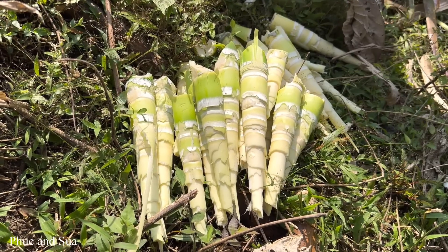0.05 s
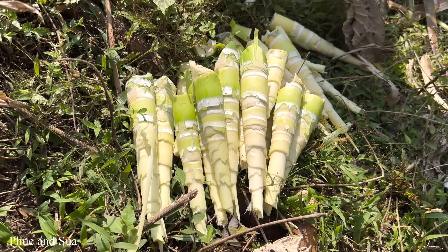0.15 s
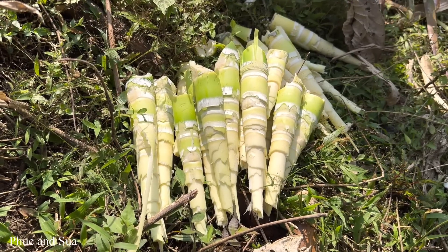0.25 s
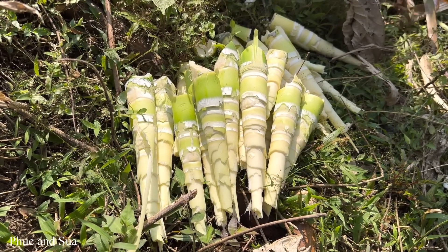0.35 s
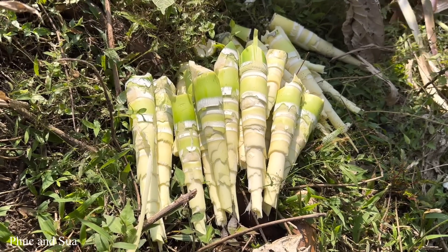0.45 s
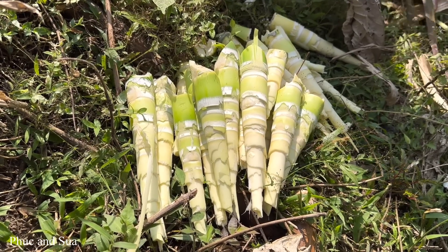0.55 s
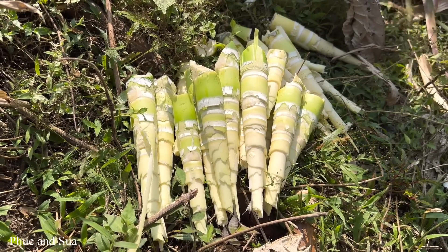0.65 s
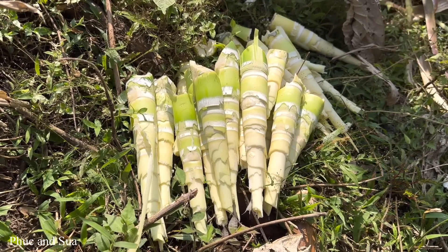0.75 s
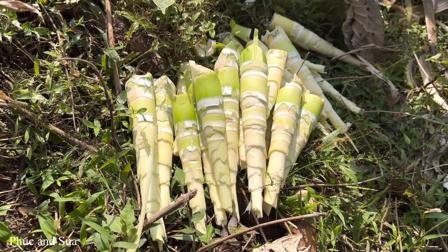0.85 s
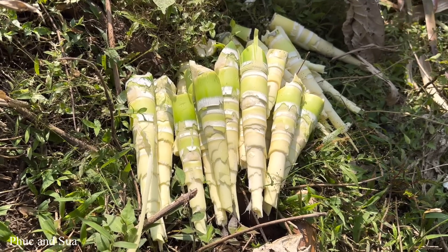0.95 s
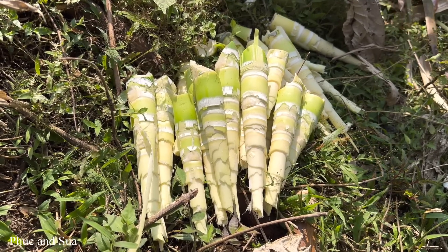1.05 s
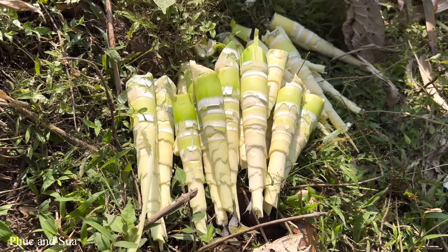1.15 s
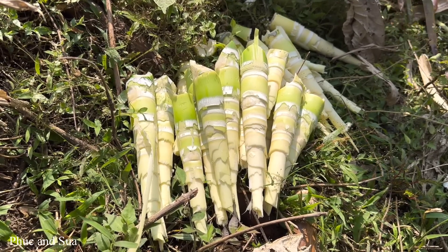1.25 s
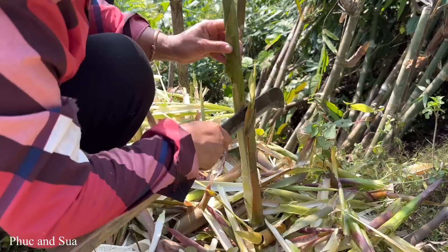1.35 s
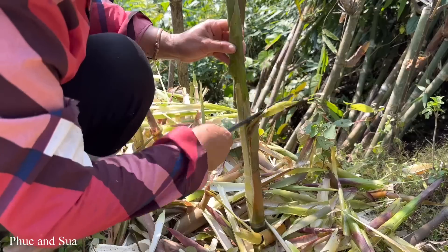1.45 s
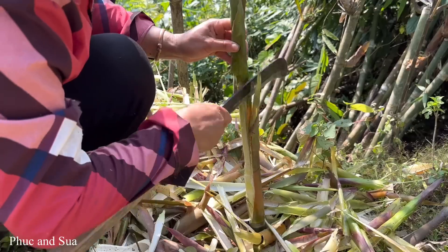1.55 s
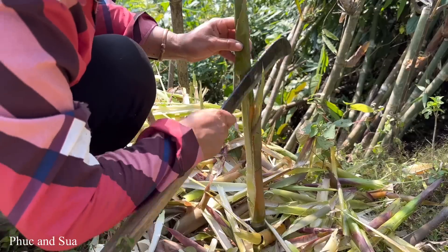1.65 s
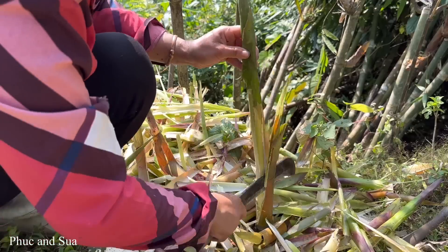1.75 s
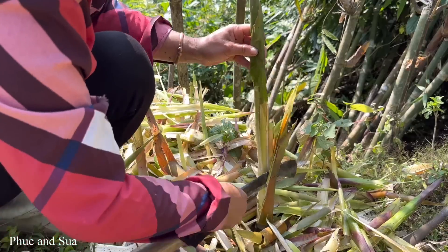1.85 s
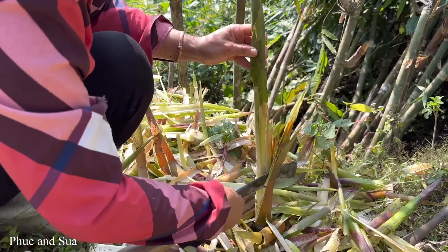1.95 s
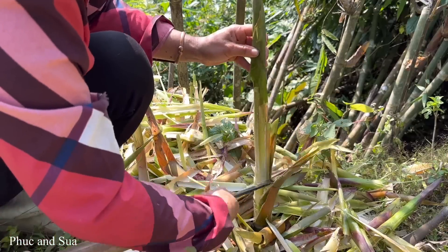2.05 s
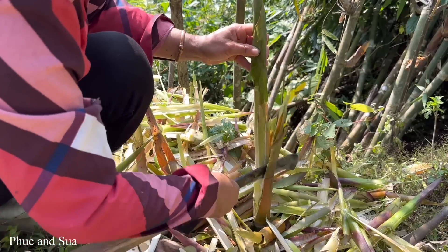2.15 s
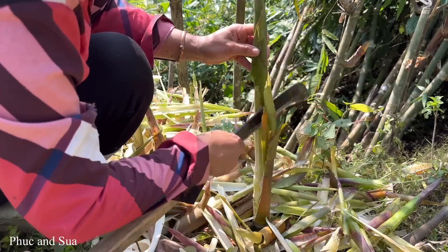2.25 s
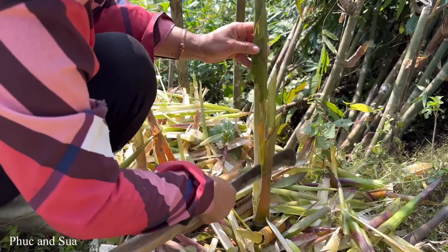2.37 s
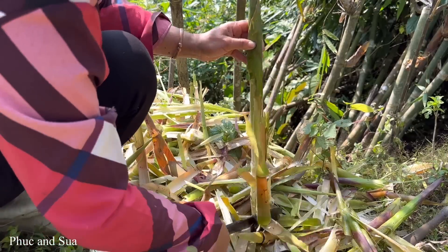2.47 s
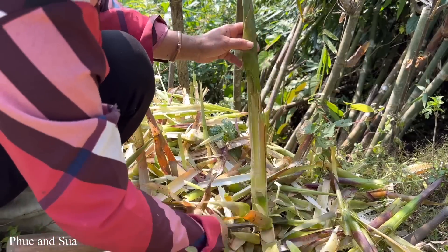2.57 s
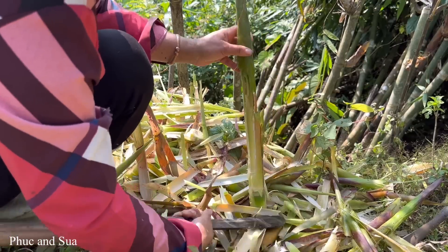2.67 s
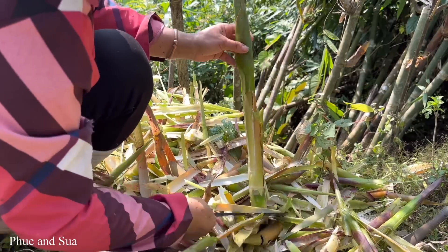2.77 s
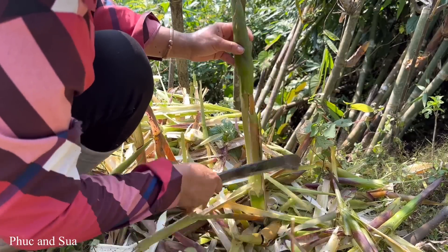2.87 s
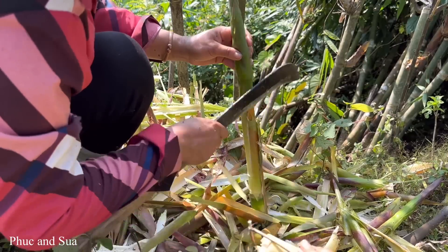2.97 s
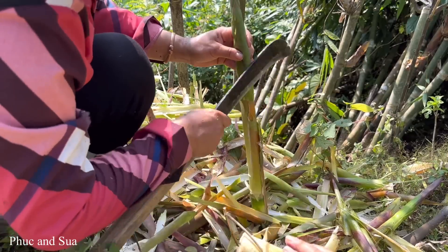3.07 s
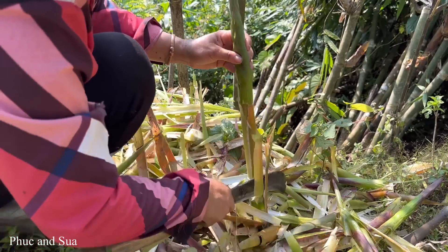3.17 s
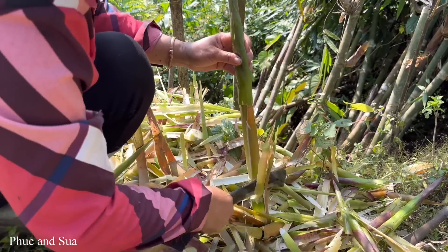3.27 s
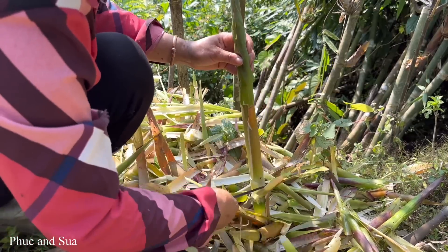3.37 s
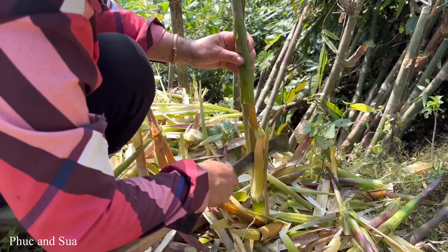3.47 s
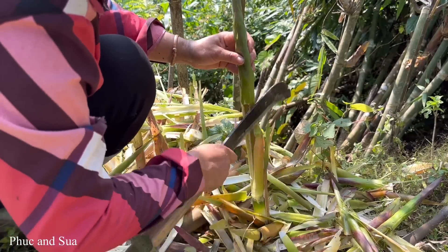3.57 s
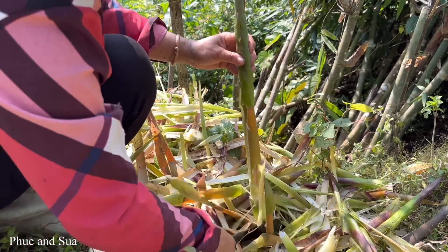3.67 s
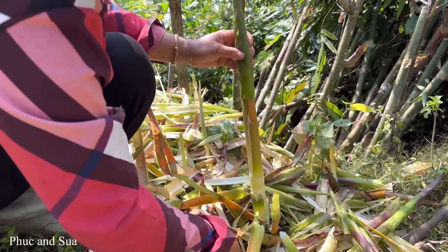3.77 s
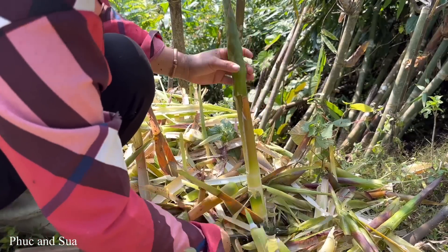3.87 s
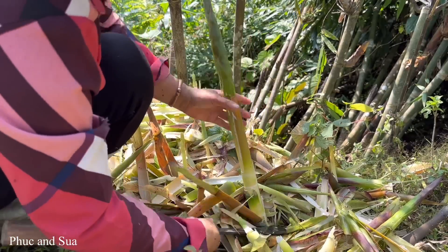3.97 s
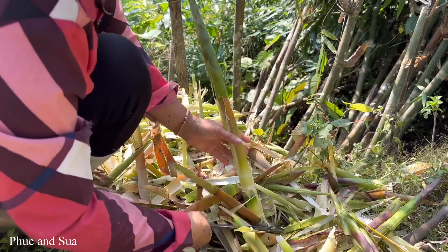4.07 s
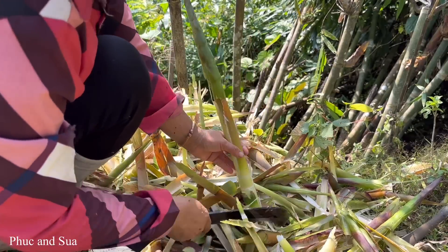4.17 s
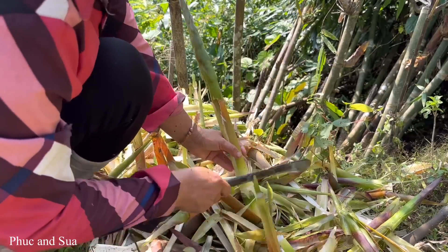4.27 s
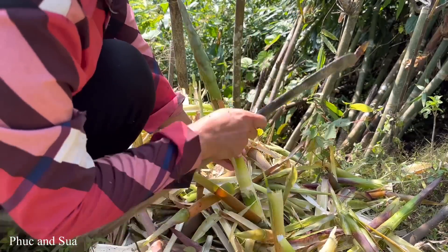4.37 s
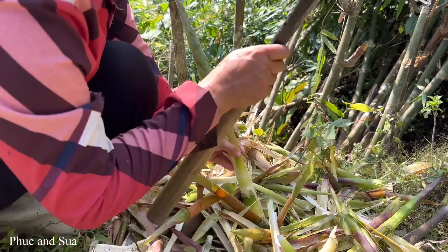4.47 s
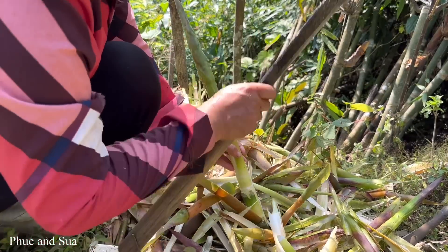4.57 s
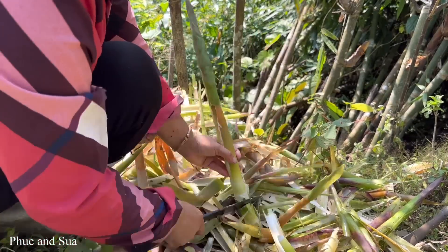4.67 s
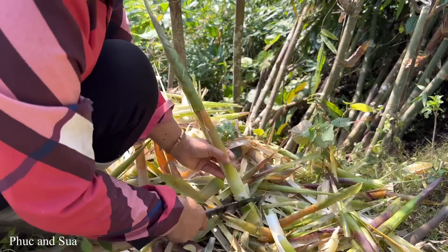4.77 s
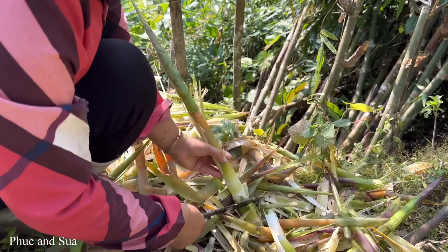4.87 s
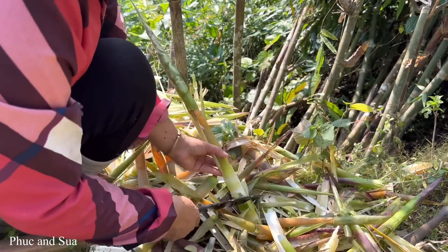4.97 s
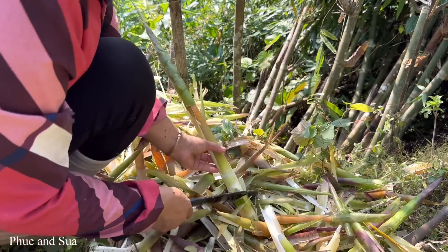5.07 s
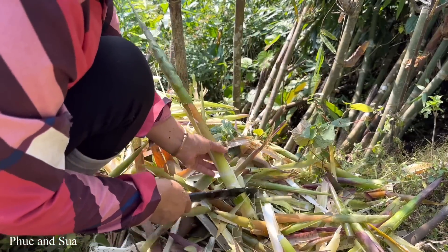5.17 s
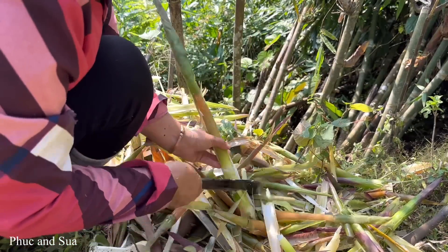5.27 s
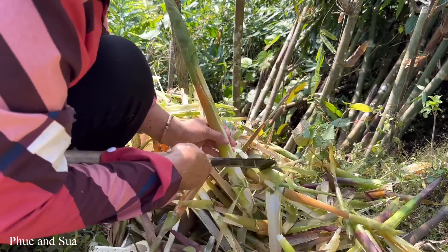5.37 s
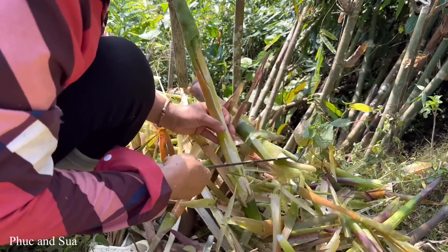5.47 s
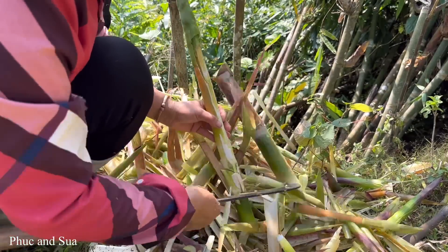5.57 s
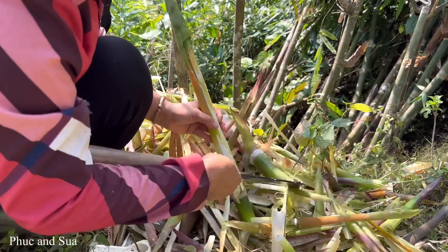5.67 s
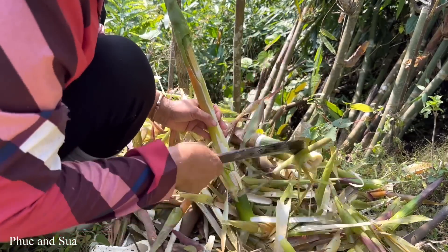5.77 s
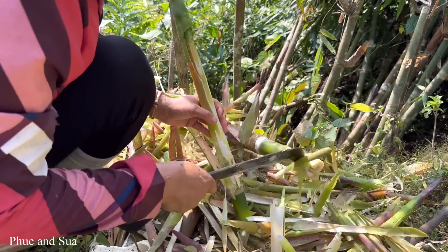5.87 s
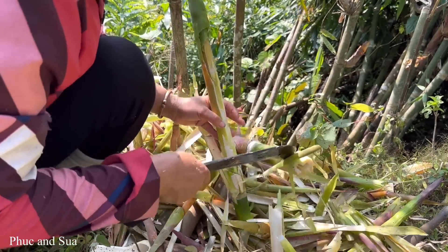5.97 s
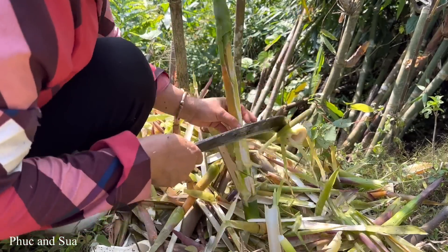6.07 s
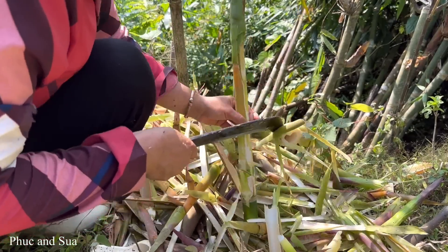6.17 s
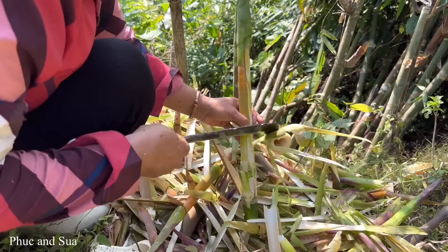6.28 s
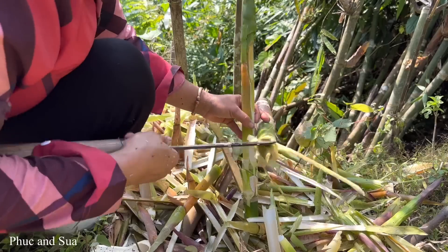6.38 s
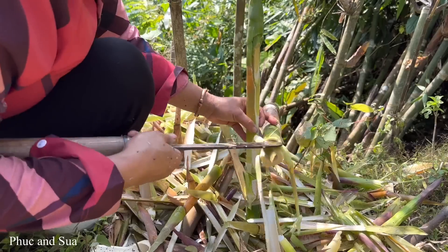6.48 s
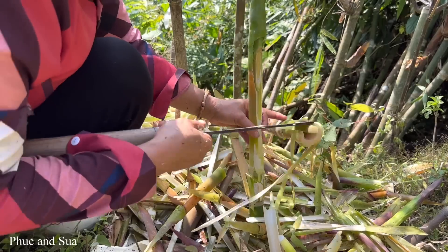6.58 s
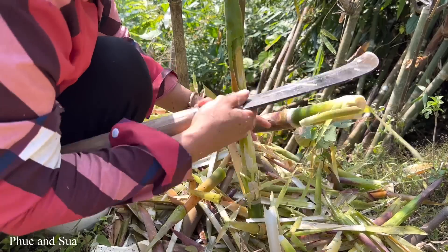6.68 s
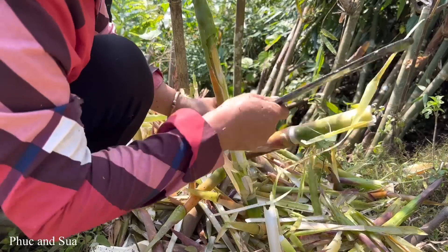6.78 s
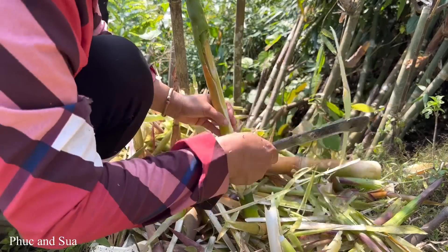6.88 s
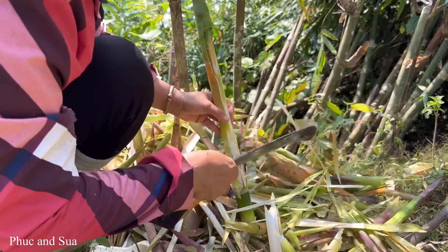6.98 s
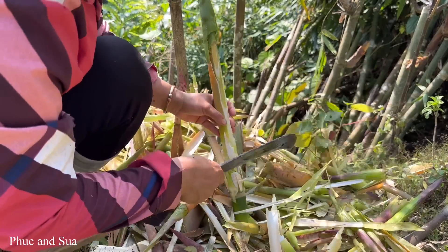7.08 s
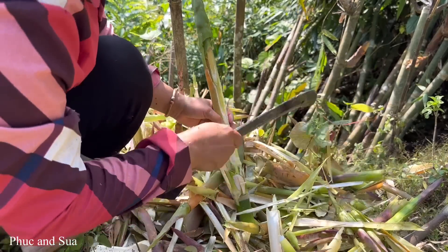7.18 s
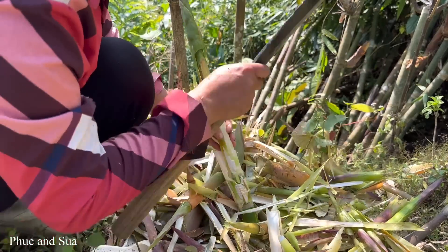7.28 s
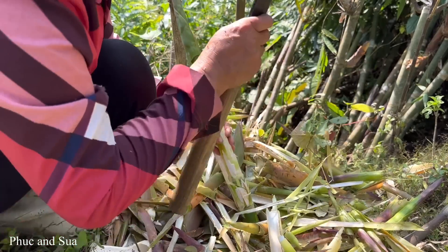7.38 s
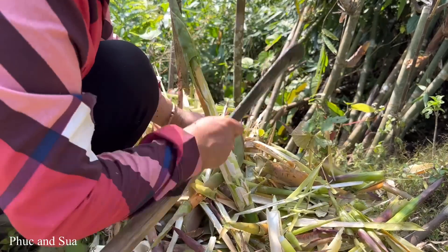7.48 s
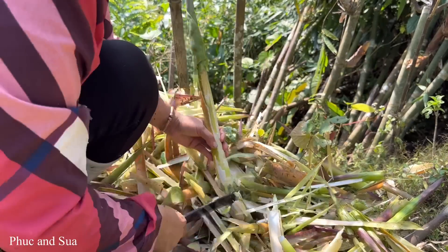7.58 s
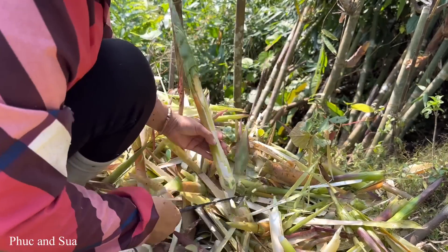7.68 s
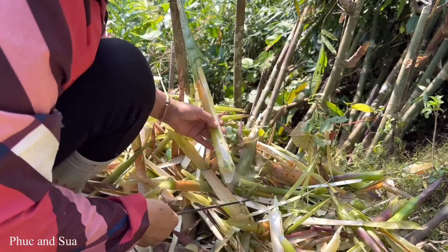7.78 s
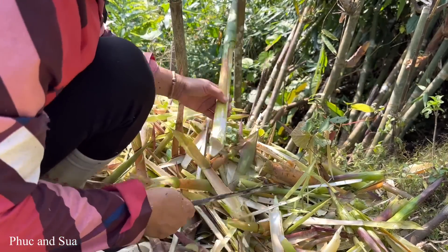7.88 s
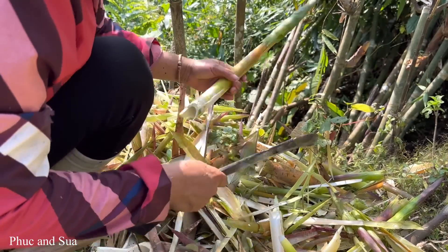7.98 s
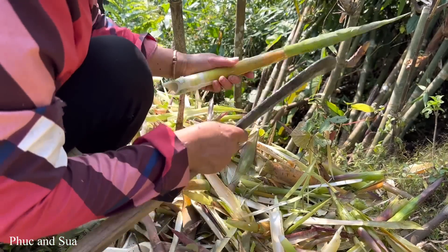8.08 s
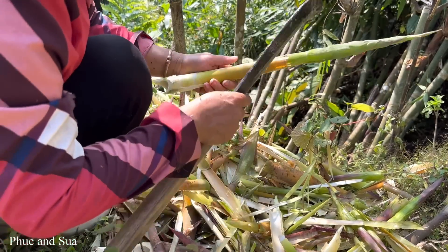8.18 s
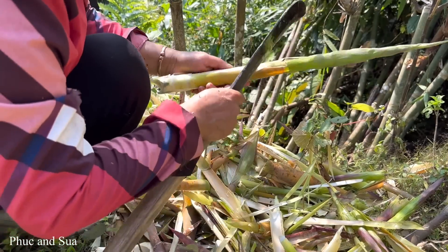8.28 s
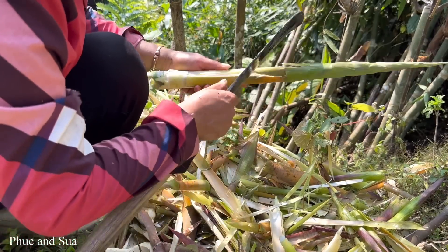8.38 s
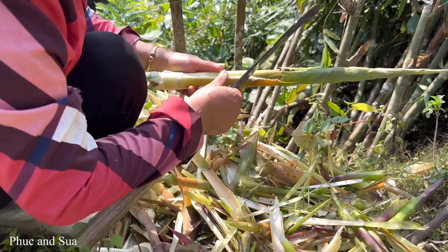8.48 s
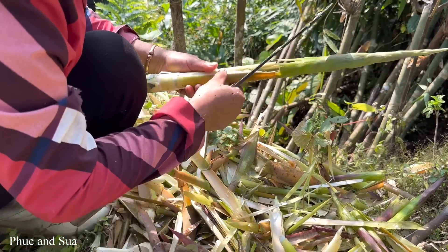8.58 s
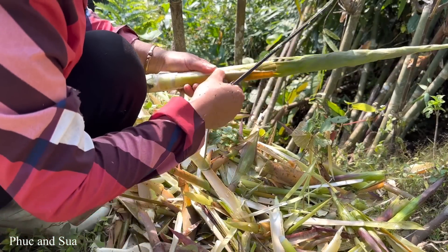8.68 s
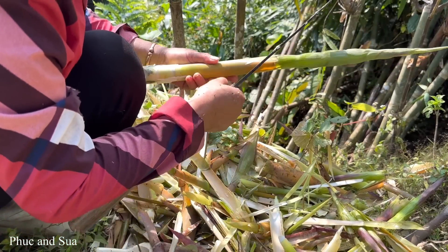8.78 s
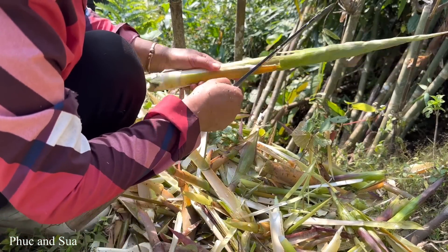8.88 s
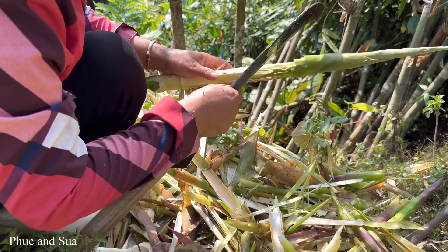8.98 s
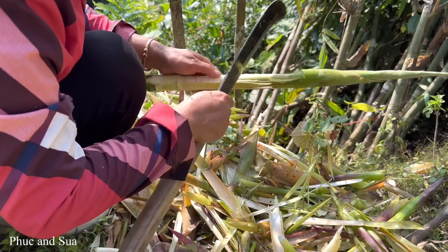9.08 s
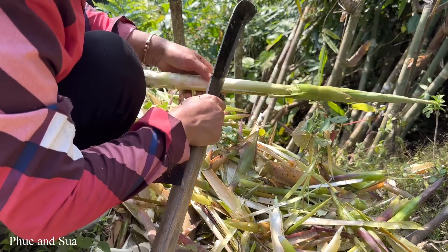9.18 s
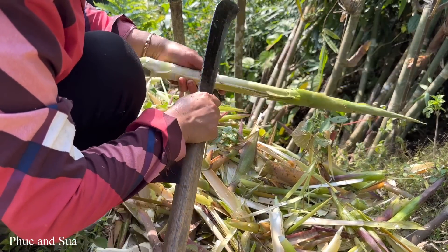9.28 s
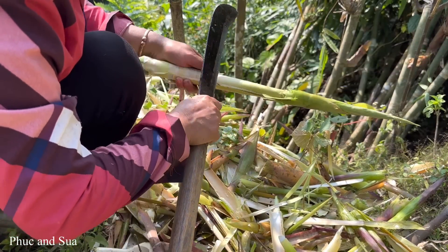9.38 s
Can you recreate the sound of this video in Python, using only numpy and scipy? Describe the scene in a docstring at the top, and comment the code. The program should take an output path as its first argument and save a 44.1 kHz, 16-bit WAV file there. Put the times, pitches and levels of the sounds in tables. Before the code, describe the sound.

A long blade strips and chops a fibrous plant stem in a quiet forest, with crisp snaps, tearing husks, loose leafy rustle and two woody whacks.

```python
"""Husking and chopping a bamboo shoot

A long blade strips the husks off a bamboo shoot and chops it in a quiet forest, close to a phone.
Ripping fibres are shaped crackle, snaps add brief rings, and chops excite the modes of the stem.
Knocks and creaks are gliding tones; loose husks rustle, and a light breeze thumps the phone's ports.
A steady far wash lies behind; the sound stops once for a short silence and fades back in."""
import sys
import numpy as np
from scipy import signal
from scipy.fft import rfft, irfft, next_fast_len
from scipy.io import wavfile
from scipy.ndimage import uniform_filter1d

SR = 44100
rng = np.random.default_rng(int(sys.argv[2]) if len(sys.argv) > 2 else 0)


def materialize(psi):
    """Save the field psi as 16-bit PCM at rate SR to the path in sys.argv[1].

    A 1-D psi becomes a single channel; in a 2-D psi each row is a channel.
    """
    bounded = np.clip(np.atleast_2d(psi).T, -1, 1)
    quanta = np.round(bounded * 32767).astype(np.int16)
    wavfile.write(sys.argv[1], SR, quanta)


N = 416304  # samples


# Relative colour of breaking husk as heard through the microphone,
# with its likely narrow resonance near 2.5 kHz: pitch_hz, gain_db
HUSK_AT_MICROPHONE = [(300, -10), (1000, -1.5), (2100, 2.5), (2500, 8.5), (3000, 3), (4200, 5), (6500, 0),
                      (8500, 1), (12000, -2.5), (15500, -4)]


def piece(pitch_hz, lift, width_hz):
    """Resonance: the husk's colour at the microphone is lifted at the pitch of the piece that gives way."""
    return lambda hz: gain_of(read(HUSK_AT_MICROPHONE, hz)) * (1 + lift / (1 + ((hz - pitch_hz) / width_hz) ** 2))


def body(breaks, top_hz):
    """Low-frequency coupling: the low share of the breaks shakes the flesh of the shoot."""
    return evened(colour(breaks, lambda hz: hz / (1 + (hz / top_hz) ** 3)))


# Husks ripped by the blade or dragged by hand:
# start_s, length_s, swell_share (of the length, 0-1), level_db, pitch_hz (loudest)
RIPS = [(.2, 0.26, 0.41, -40.5, 2450), (0.691, 0.068, 0.38, -45, 6540), (1.694, 0.062, 0.34, -19.5, 2480),
        (1.72, 0.04, 0.52, -23, 2400), (2.017, 0.033, 0.34, -17, 2540), (2.377, 0.0308, 0.58, -33, 3500),
        (2.405, 0.05996, 0.33, -18.5, 3030), (3.147, 0.032, 0.26, -33.5, 4000),
        (3.168, 0.075, 0.39, -23.5, 3970), (3.665, 0.068, 0.15, -21.5, 6270),
        (5.699, 0.065, 0.26, -45, 2400), (5.99, 0.096, 0.54, -43.5, 5080),
        (6.201, 0.092, 0.33, -42.5, 6600), (6.53, 0.0798, 0.57, -42.5, 6320),
        (6.606, .16, 0.32, -45.5, 6300), (6.903, 0.16, 0.49, -40, 4920), (7.028, 0.1, 0.36, -48.5, 6140),
        (8.699, 0.083, 0.4, -43, 6120), (8.848, 0.057, 0.34, -40.5, 5940), (9.29, 0.088, 0.25, -49, 6100)]
RIP_BRIGHT_DB, RIP_BRIGHT_DB_PER_OCTAVE = 3, -3.5
RIP_BODY_DB, RIP_BODY_DB_PER_OCTAVE = -18, 6  # higher-pitched rips carry more low body


def rip(start_s, length_s, swell_share, level_db, pitch_hz):
    """Fracture noise: a run of breaking fibres swells and dies; gentle runs are lumpier."""
    t = np.arange(0, length_s, 1 / SR)
    pull = np.interp(t / length_s, [0, np.clip(swell_share, 0, 1), 1], [0, 1, 0])
    breaks = crackle(len(t), spread_db=abs(.08 * level_db), grain_s=0.0019, patchy_db=3.0)
    octaves = np.log2(pitch_hz / 4000)
    bright_db = RIP_BRIGHT_DB + RIP_BRIGHT_DB_PER_OCTAVE * octaves
    body_db = RIP_BODY_DB + RIP_BODY_DB_PER_OCTAVE * octaves
    fibres = evened(colour(breaks, piece(pitch_hz, lift=1.9, width_hz=380)))
    fibres = brightened(fibres, bright_db)
    flesh = gain_of(body_db) * body(breaks, top_hz=636)
    envelope = gain_of(level_db - 26.0 * (1 - pull) ** 1.932)
    return start_s, envelope * (fibres + flesh)


# The clearest single fibres snapping: start_s, level_db, pitch_hz (loudest)
SNAPS = [(.0687, -39, 1780), (0.1489, -38.5, 2670), (0.1644, -35.5, 2820), (0.2216, -27.5, 13500),
         (0.2362, -23.5, 1270), (.2658, -34.5, 3000), (0.3822, -31.5, 1235), (0.4719, -33, 2450),
         (0.5046, -37.5, 2400), (0.5275, -39, 2410), (.5995, -39.5, 6500), (.623, -40, 2310),
         (0.6585, -38, 6570), (.7038, -37, 6110), (0.7658, -30, 6640), (0.8873, -32.5, 2390),
         (1.391, -29.5, 8530), (1.4268, -33, 4920), (1.4482, -27, 8500), (1.4644, -26.5, 8600),
         (1.7021, -16, 8230), (1.7333, -13, 2410), (1.7525, -16.5, 2270), (1.9621, -22.5, 2340),
         (1.9944, -29, 2350), (2.0083, -21.5, 2430), (2.0481, -30, 4570), (2.0579, -27, 4380),
         (2.1161, -32, 5860), (2.4322, -15, 6300), (3.1735, -22, 3380), (3.2698, -35, 4040),
         (3.3622, -30, 6550), (3.6755, -19, 6400), (3.8791, -34.5, 6220), (6.0004, -37.5, 6260),
         (6.0254, -36, 5570), (6.0694, -33.5, 6820), (6.2704, -34, 2140), (6.4351, -29.5, 8230),
         (6.4559, -31.5, 6490), (6.492, -29.5, 5900), (6.522, -32.0, 5860), (6.5781, -36.5, 2840),
         (6.7083, -36, 6040), (6.8622, -36.5, 2170), (6.8903, -35, 2060), (7.067, -40, 6040),
         (7.1245, -34, 6400), (7.4997, -33, 3260), (7.5318, -30.5, 2830), (8.528, -37, 1900),
         (8.7275, -37, 6000), (8.8563, -30, 6010), (8.865, -31, 6040), (8.9202, -34.5, 6550),
         (8.947, -41.5, 5960), (9.2975, -33.5, 6200), (9.308, -38, 8200)]


def snap(start_s, level_db, pitch_hz):
    """Impulsive fracture: a sharp break, a woody ring and scatter off the litter; high ones are brighter."""
    t = np.arange(2000) / SR
    crack = (1 - np.exp(-(t / .0009) ** 2)) * gain_of(-60 * t / .008)
    scatter = (1 - np.exp(-t / 0.0031)) * gain_of(-19.5 - 60 * t / 0.07)
    noise = colour(rng.standard_normal((2, len(t))), piece(pitch_hz, lift=3.2, width_hz=400))
    bright_db = 3 + 3.9 * np.log2(pitch_hz / 3000)
    fracture = brightened(noise, bright_db) * (crack + scatter)
    fracture = fracture / np.sqrt(np.mean(fracture[:, :150] ** 2))  # levelled on its first 150 samples
    ring_decay = gain_of(-1.0 - 60 * t * pitch_hz / 45)  # 60 dB in 45 cycles
    ring = ring_decay * np.sin(2 * np.pi * pitch_hz * t) * (1 - np.exp(-t / 0.0012))
    return start_s, gain_of(level_db) * (fracture + ring)


# Modes of the stem: pitch_hz, relative_level_db
STEM_MODES = [(750, -2.5), (1100, -6.5), (1550, 4.5), (2020, 1.5), (2570, 4.5), (3300, -2.5), (4600, -2),
              (6400, -6), (8500, 5)]
# Blows into the stem: start_s, blow_db, pitch_hz (loudest), splinter_db, bright_db,
# ring_hz (hollow joint), ring_db, thud_db (into the ground)
CHOPS = [(4.6716, -6.5, 2065, -25, 12.5, 501, -28, -25.5), (7.5431, -8, 1500, -13, 5.5, 473, -18.5, -27)]


def chop(start_s, blow_db, pitch_hz, splinter_db, bright_db, ring_hz, ring_db, thud_db):
    """Modal excitation: a crush of a few ms rings the stem; hollow joint and ground answer late."""
    t = np.arange(9000) / SR
    crush = (1 - np.exp(-(t / .0025) ** 2)) * gain_of(-60 * t / .026)
    mode_hz, mode_db = np.transpose(STEM_MODES)[..., None]
    mode_gain = gain_of(mode_db - 2.9 * np.log2(mode_hz / pitch_hz) ** 2)
    turns = mode_hz * t + rng.random((2, len(mode_hz), 1))  # random starting phases
    blow = crush * (mode_gain * np.sin(2 * np.pi * turns)).sum(1)

    breaks = crackle(len(t), spread_db=.7, grain_s=.004, patchy_db=2)
    splinters = evened(colour(breaks, piece(pitch_hz, lift=4.8, width_hz=780)))
    splinters = splinters + gain_of(-9.5) * body(breaks, top_hz=525)
    burst, tail = gain_of(blow_db - 6 - 60 * t / 0.022), gain_of(splinter_db - 60 * t / 0.11)
    splinters = brightened(splinters, bright_db) * (1 - np.exp(-t / 0.00032)) * (burst + tail)

    ring_envelope = gain_of(ring_db - 60 * t / .16) * (1 - np.exp(-(t / .012) ** 2))
    ring = ring_envelope * np.sin(2 * np.pi * ring_hz * t)
    after_thud = t - .018  # seconds from the centre of the thud
    thud = gain_of(thud_db) * np.exp(-(after_thud / 0.00382) ** 2) * np.cos(2 * np.pi * 100 * after_thud)
    return start_s, gain_of(blow_db) * blow + splinters + ring + thud


# A stalk knocked along its length: start_s, level_db
KNOCKS = [(3.3298, -34.5), (5.1058, -35)]
KNOCK_TURNS, KNOCK_S = 1.16, 0.0096  # pitch is close to turns over time since the knock; length


def knock(start_s, level_db):
    """Bending-wave dispersion: treble arrives first, so a click slides down into a low thump."""
    t = np.arange(1, round(KNOCK_S * SR)) / SR
    glide = np.sin(2 * np.pi * KNOCK_TURNS * np.log(t * SR / 8 + 1))
    wave = glide * np.cos(np.pi / 2 * t / KNOCK_S) ** .5
    return start_s, gain_of(level_db) * np.array([wave, wave])


# Brief pitched creaks of bent stalks: start_s, length_s, start_hz, end_hz, level_db
CREAKS = [(5.285, 0.041, 2141, 1665, -36.5), (6.27, 0.0253, 1490, 1504, -44), (6.655, .03, 530, 513, -42)]


def creak(start_s, length_s, start_hz, end_hz, level_db):
    """Frequency and amplitude modulation: a short tone glides and is roughened by slow noise."""
    count = round(length_s * SR)
    tone = np.sin(2 * np.pi * np.cumsum(np.linspace(start_hz, end_hz, count)) / SR)
    rough = 1 + 0.793 * evened(uniform_filter1d(rng.standard_normal((2, count)), 60))
    return start_s, gain_of(level_db) * tone * rough * np.hanning(count) ** .5


# Relative colour of stirred leaves: pitch_hz, gain_db
LEAF_COLOUR = [(300, -17), (1200, 3.5), (2500, 3), (4000, -1.5), (7000, 0), (15500, -3.5)]
# Husks and leaves being stirred, joined by straight lines: time_s, level_db
RUSTLE = [(0, -49), (.55, -52), (.85, -59), (1.25, -76), (1.6, -47), (1.95, -53.5), (2.5, -44),
          (3.0, -53.5), (4.1, -49), (4.4, -57.5), (5.15, -53), (5.45, -44.5), (5.93, -52), (7.05, -52.5),
          (7.4, -58), (7.6, -46.5), (7.9, -63.5), (9.44, -61.5)]
SETTLE_DB, SETTLE_T60_S = -31.5, 0.83  # settling litter relative to its rip or chop; 60 dB decay time


def rustle():
    """Friction noise: loose husks brush each other, brighter when stirred harder; shaken litter settles."""
    t = np.arange(N) / SR
    power = gain_of(np.interp(t, *np.transpose(RUSTLE))) ** 2
    rip_ends = [(start_s + length_s, level_db) for start_s, length_s, _, level_db, _ in RIPS]
    blows = [(row[0], row[3]) for row in CHOPS]  # time and splinter level
    for shake_s, shake_db in rip_ends + blows:
        settling_db = shake_db + SETTLE_DB - 60 * np.maximum(t - shake_s, 0) / SETTLE_T60_S
        power = power + (t > shake_s) * gain_of(settling_db) ** 2
    level_db = 10 * np.log10(power)
    brushing = crackle(N, spread_db=3.5, grain_s=0.0092, patchy_db=3.0)
    brushing = evened(colour(brushing, lambda hz: gain_of(read(LEAF_COLOUR, hz))))
    return gain_of(level_db) * brightened(brushing, 0.42 * (level_db + 52.5))


# Puffs of breeze on the ports: centre_s, length_s, level_db
PUFFS = [(0.049, 0.19, -47), (0.599, 0.2, -49), (6.222, 0.092, -40.5), (6.712, 0.97, -54.5)]


def breeze():
    """Wind pressure noise: lumpy low-frequency pressure on the ports."""
    t = np.arange(N) / SR
    strength = sum(gain_of(db) * np.exp(-((t - s) / length * 2) ** 2) for s, length, db in PUFFS)
    pressure = colour(rng.standard_normal((2, N)), lambda hz: hz ** 2 / (1 + (hz / 60) ** 5))
    return strength * evened(pressure)


# Relative spectrum of the distant forest: pitch_hz, gain_db
FOREST_COLOUR = [(15, -46), (25, -25.5), (59, -0.5), (239, -5.5), (482, -8.5), (1020, -10), (10000, -31.5),
                 (13000, -87.5)]
FOREST_DB = -49  # rms level before the ports


def forest():
    """Stationary filtered noise: the steady far wash of the wood."""
    wash = colour(rng.standard_normal((2, N)), lambda hz: gain_of(read(FOREST_COLOUR, hz)))
    return gain_of(FOREST_DB) * evened(wash)


# The two ports: pitch_hz, near_likeness (0-1), far_likeness (0-1), left_over_right_db,
# phase_shift (half turns)
PORTS = [(200, .93, .9, 0, 0), (800, .85, .45, -2, .05), (2200, .7, .2, -3, -.1), (3500, .5, .2, 0, -.3),
         (5500, .65, .2, 3, -.15), (8800, .85, .6, -1, .1), (10500, .93, .9, 0, .95),
         (12200, .97, .97, 0, 1.05), (13800, .99, .99, 0, 2)]


def ports(paths, column):
    """Coherence: the right port hears part of the left path, phase-shifted by the body of the phone."""
    hz, (left, other) = np.fft.rfftfreq(N, 1 / SR), rfft(paths)
    same = np.clip(read(PORTS, hz, column), 0, 1)
    lean = gain_of(read(PORTS, hz, column=3) / 2)
    right = same * left + np.sqrt(1 - same ** 2) * other
    right = right * np.exp(1j * np.pi * read(PORTS, hz, column=4))
    return irfft(np.array([left * lean, right / lean]), N)


def crackle(count, spread_db, grain_s, patchy_db):
    """Granular noise: two paths share lumps from many tiny breaks and a few large, in coloured patches."""
    sizes = gain_of(spread_db * np.minimum(rng.exponential(1, count), 5))
    kicks = sizes * (rng.random(count) < 1 / 30)
    lumps = signal.lfilter([1], [1, -np.exp(-1 / (grain_s * SR))], kicks)
    z = signal.stft(lumps * rng.standard_normal((2, count)), nperseg=256, noverlap=192)[2]
    patches = uniform_filter1d(rng.standard_normal(z.shape[1:]), size=4, axis=0)  # across frequency
    patches = uniform_filter1d(patches, size=8, axis=1)  # across time
    z = z * gain_of(patchy_db * evened(patches))
    return evened(signal.istft(z, nperseg=256, noverlap=192)[1][:, :count])


def brightened(x, bright_db):
    """Spectral tilt: changes the treble, from none at 3 kHz to bright_db at 12 kHz and above."""
    treble = colour(x, lambda hz: np.clip(np.log2(hz / 3000 + 1e-9) / 2, 0, 1))
    return x + (gain_of(bright_db) - 1) * treble


def colour(x, gain):
    """Linear filtering: multiplies the spectrum by a gain given as a function of Hz."""
    size = next_fast_len(x.shape[-1] + 256)
    return irfft(rfft(x, size) * gain(np.fft.rfftfreq(size, 1 / SR)), size)[..., :x.shape[-1]]


def gain_of(db):
    """Decibel law: converts decibels to an amplitude gain."""
    return 10 ** (np.asarray(db) / 20)


def evened(x):
    """Energy normalisation: scales to rms 1."""
    return x / np.sqrt(np.mean(x ** 2) + 1e-20)


def read(points, hz, column=1):
    """Interpolation on a log-frequency axis: reads one column of a table."""
    table = np.transpose(points)
    return np.interp(np.log(hz + 1), np.log(table[0] + 1), table[column])


def add(mix, start_s, sound):
    """Superposition: mixes a two-channel sound in at start_s."""
    part = mix[:, round(start_s * SR):][:, :sound.shape[1]]
    part += sound[:, :part.shape[1]]


def scene():
    """Superposition of near and far fields: hands and blade near, forest and breeze around."""
    near = rustle()
    for table, source in ((RIPS, rip), (SNAPS, snap), (CHOPS, chop), (CREAKS, creak), (KNOCKS, knock)):
        for row in table:
            add(near, *source(*row))
    return ports(near, column=1) + ports(forest() + breeze(), column=2)


# The short silence: silence_start_s, fade_start_s, fade_end_s
SILENCE = (1.277, 1.33, 1.508)
ROLL_HZ, ROLL_DB = 15900, -32  # the microphone path dulls above here, by this much
EDGE_HZ = 16970  # band limit


def record(dry):
    """Gating and band limitation: a silence with a fade-in, a dulled top and a low-pass edge."""
    t = np.arange(N) / SR
    silence_start_s, fade_start_s, fade_end_s = SILENCE
    fade = np.clip((t - fade_start_s) / (fade_end_s - fade_start_s), 0, 1) ** 2
    gate = np.where(t < silence_start_s, 1, fade)
    dulled = colour(dry * gate, lambda hz: gain_of(ROLL_DB * np.clip((hz - ROLL_HZ) / 250, 0, 1)))
    low_pass = signal.firwin(511, EDGE_HZ, window=("kaiser", 9), fs=SR)
    return signal.oaconvolve(dulled, low_pass[None], "same")


dry = scene()
out = record(dry)
materialize(out)
```